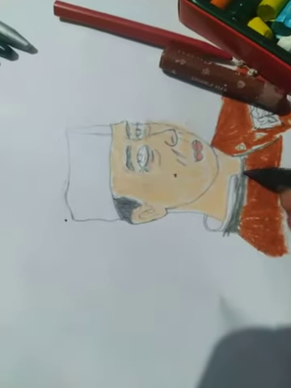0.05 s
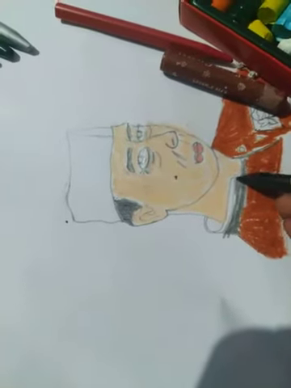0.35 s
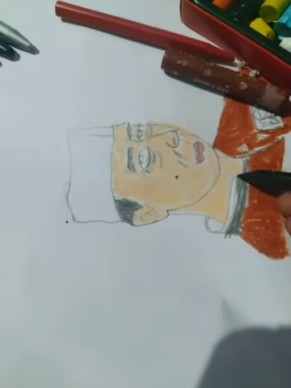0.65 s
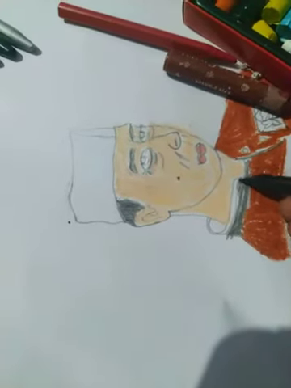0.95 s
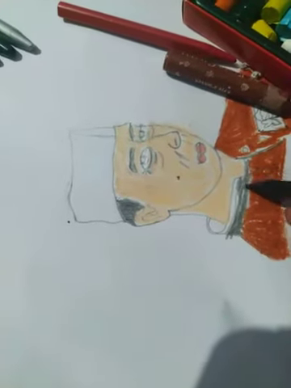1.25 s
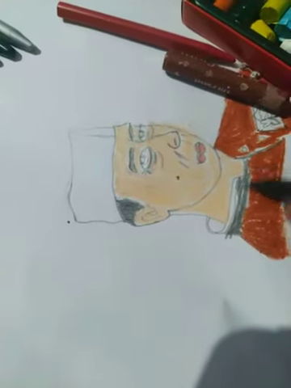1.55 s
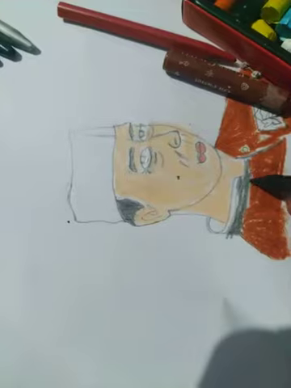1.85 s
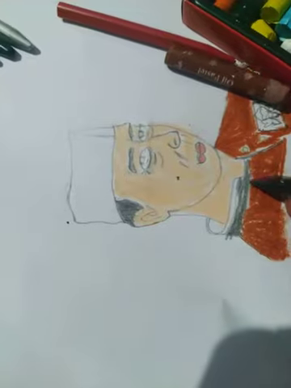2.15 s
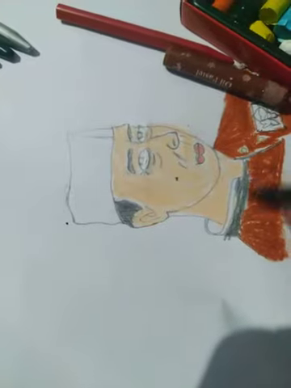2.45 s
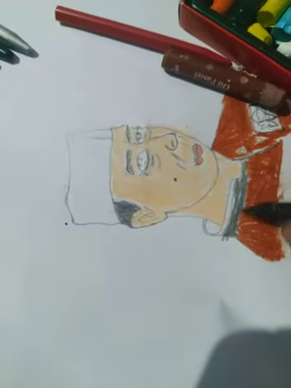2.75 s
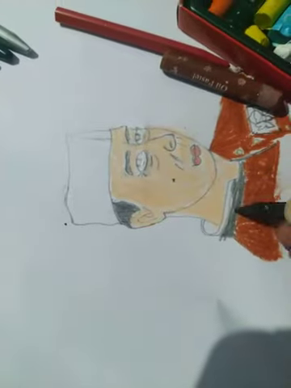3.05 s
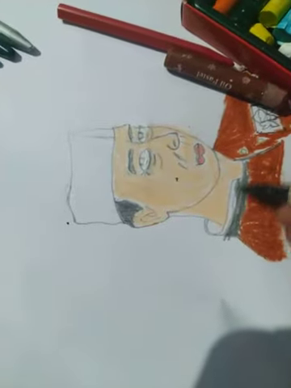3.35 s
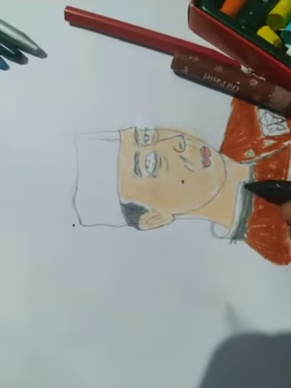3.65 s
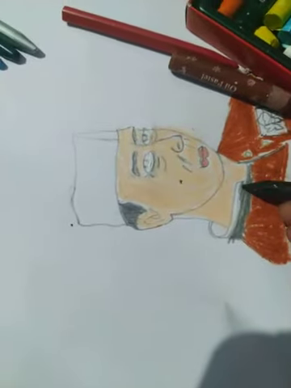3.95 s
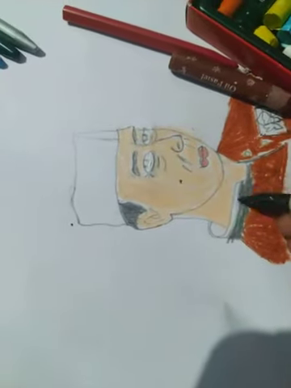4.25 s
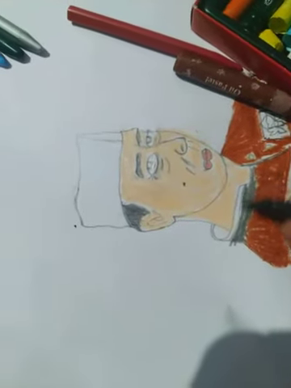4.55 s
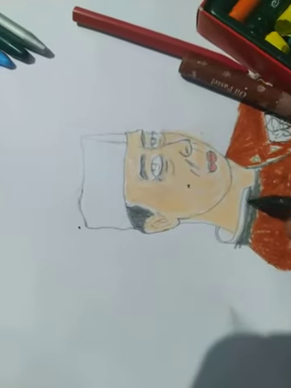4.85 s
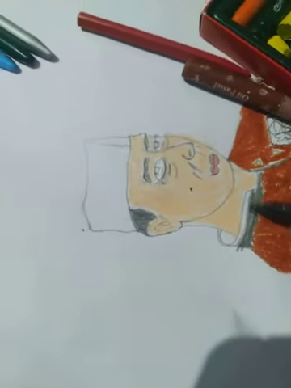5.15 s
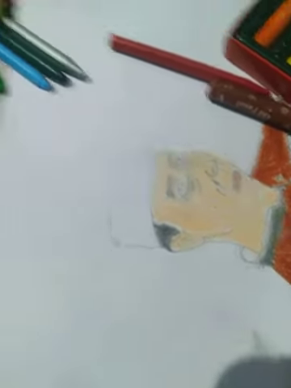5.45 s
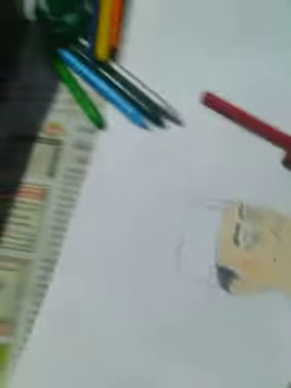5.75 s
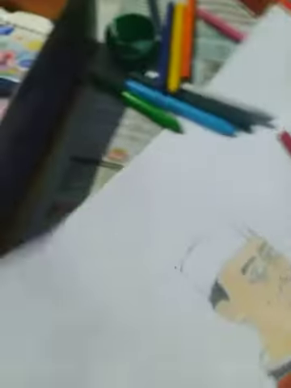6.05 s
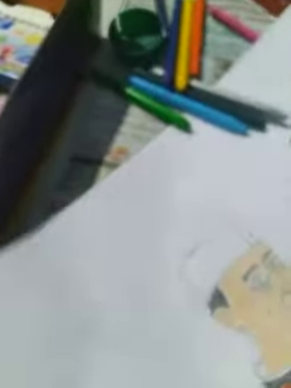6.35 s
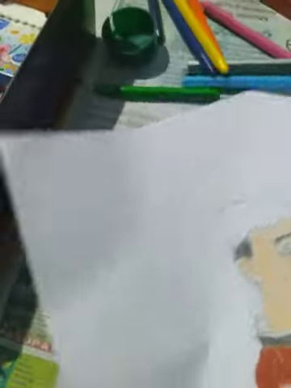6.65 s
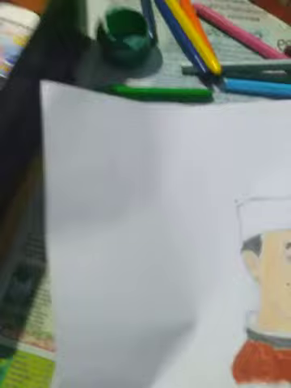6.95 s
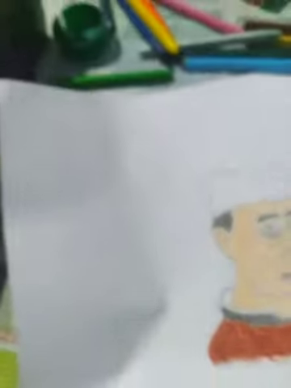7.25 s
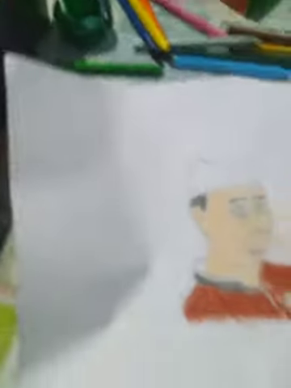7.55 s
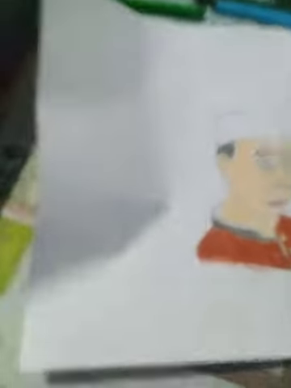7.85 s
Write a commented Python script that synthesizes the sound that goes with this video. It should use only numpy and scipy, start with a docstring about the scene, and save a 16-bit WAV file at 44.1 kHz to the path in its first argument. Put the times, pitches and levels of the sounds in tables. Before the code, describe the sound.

Soft, quick crayon strokes on a desk give way to louder rustling and popping as the paper is dragged and lifted.

```python
"""At a desk in a small room with a low hum, a wax crayon shades a drawing in quick back-and-forth strokes.
The wax sticks and slips on the paper, and the tip bumps the desk through it. Then the sheet is dragged
over newspaper and lifted: it hisses as it slides and buckles with dull pops and crisp snaps.
Now and then a crayon knocks on the desk with a short woody ring."""
import sys
import numpy as np
from scipy import signal
from scipy.fft import rfft, irfft, next_fast_len
from scipy.io import wavfile
from scipy.ndimage import map_coordinates

SR = 44100
rng = np.random.default_rng(int(sys.argv[2]) if len(sys.argv) > 2 else 0)


def to_wav(s):
    """Save 16-bit WAV."""
    ch = np.atleast_2d(s).T  # columns
    pcm = np.round(np.clip(ch, -1, 1) * 32767)  # PCM
    wavfile.write(sys.argv[1], SR, pcm.astype(np.int16))


N = 353241


def amp(db):
    """Turn decibels into a number to multiply a sound by."""
    return 10 ** (np.asarray(db) / 20)


def unit(pair):
    """Scale left and right so that their average has a strength (rms) of 1."""
    return pair / np.sqrt(np.mean(pair.mean(0) ** 2) + 1e-20)


def along(points, hz):
    """Read between the rows of a (frequency, value) table, with octaves evenly spaced."""
    freqs, values = np.transpose(points)
    return np.interp(np.log(hz + 1), np.log(freqs + 1), values)


def wobble(rate):
    """A smooth curve through `rate` random values a second."""
    return map_coordinates(rng.standard_normal(int(N * rate / SR) + 4), [np.arange(N) * rate / SR])


def filtered(x, response):
    """Turn each frequency of x up or down by response(hz)."""
    size = next_fast_len(N + SR // 2)
    return irfft(rfft(x, size) * response(np.fft.rfftfreq(size, 1 / SR)), size)[..., :N]


def ringing(noise, centre_hz, width_hz):
    """Keep the noise near one frequency, so that it rings with a wavering pitch."""
    return unit(filtered(noise, lambda hz: 1 / (1 + ((hz - centre_hz) / width_hz) ** 2)))


def add(track, start, sound):
    """Mix a sound into the track, `start` seconds in."""
    part = track[..., round(start * SR):][..., :sound.shape[-1]]
    part += sound[..., :part.shape[-1]]


# how alike left and right sound: f/Hz, likeness (1 = the same, 0 = unrelated)
LIKENESS = [(60, 0.96), (130, 0.81), (300, 1), (640, 0.085), (1400, -0.19), (3000, 0.011), (15000, -0.05)]

def stereo_shares(hz):
    """How much sound the two sides have in common, and how much they have with opposite signs."""
    angle = np.arccos(np.clip(along(LIKENESS, hz), -1, 1)) / 2
    return np.array([np.cos(angle), np.sin(angle)])


def spread(noises, tone, balance):
    """Give two unrelated noises a tone and place them between left and right."""
    common, opposite = filtered(noises, lambda hz: amp(along(tone, hz)) * stereo_shares(hz))
    pair = np.array([common + opposite, common - opposite])
    return unit(filtered(pair, lambda hz: amp(np.outer([.5, -.5], along(balance, hz)))))


def friction(tone, balance, slips_per_s, slip_db):
    """Rubbing is smooth noise plus tiny clicks as paper fibres catch and slip."""
    slips = (rng.random(N) < slips_per_s / SR) * rng.standard_normal((2, N))
    smooth = unit(rng.standard_normal((2, N)))
    return spread(smooth + amp(slip_db) * unit(slips), tone, balance)


# the tone of the room's steady noise: f/Hz, level/dB
AIR_TONE = [(25, -34), (48, -16), (90, -5), (120, -10), (190, -7.5), (300, -9.5), (430, -6), (520, -16),
            (930, -19), (1150, -20), (1700, -25.5), (5000, -33.5), (7900, -42.5), (12000, -33.5),
            (16000, -40)]

def background(air_db=-60, hum_db=-65):
    """Low room noise with a wavering hum."""
    air = spread(rng.standard_normal((2, N)), AIR_TONE, balance=[(100, 0), (10000, 0)])
    return amp(air_db) * air + amp(hum_db) * ringing(air, centre_hz=57, width_hz=5)


# how long the echo lasts (a fade time is the time to drop by 60 dB): f/Hz, fade/s
ECHO_FADE = [(100, 0.5), (300, .38), (1000, 0.25), (10000, 0.7)]
# the tone of the echo: f/Hz, level/dB
ECHO_TONE = [(50, 14), (140, -0.5), (250, 5.5), (420, -13), (620, 4), (2000, -4), (10000, -4.5)]

def room_echo(sound):
    """The walls answer each sound with a short wash of reflections, strongest in the bass."""
    hz, t, noise = signal.stft(rng.standard_normal((2, SR // 2)), SR, nperseg=256)
    common, opposite = stereo_shares(hz)[:, :, None] * noise
    fade = amp(-60 * t / along(ECHO_FADE, hz)[:, None])
    tail = signal.istft(fade * np.array([common + opposite, common - opposite]), SR, nperseg=256)[1]
    delayed = np.pad(sound, ((0, 0), (SR // 250, 0)))  # 4 ms late
    echo = signal.fftconvolve(delayed, tail / np.linalg.norm(tail[0]), axes=1)[:, :N]
    return filtered(echo, lambda hz: amp(along(ECHO_TONE, hz)))


# hard knocks of a crayon: t/s, level/dB, brightness/dB per octave
CRAYON_KNOCKS = [(2.067, -45.5, 18), (3.5005, -45, 11), (5.595, -28, 6), (5.598, -26.5, 9),
                 (5.6045, -28.5, 12), (6.4724, -7.5, 3), (7.9235, -33, 18), (7.9388, -29, 14)]
# the notes that ring in each knock: f/Hz, level/dB, fade/s
KNOCK_NOTES = [(1370, -16, 0.011), (1640, -10.5, 0.031), (1958, -17, 0.052), (2020, 3.5, 0.0058),
               (2340, 4, 0.0071), (2640, -19, 0.059), (3160, -16, 0.028), (3690, -17, 0.014),
               (3940, -28, 0.014), (4540, -30, 0.027)]

def knocks(level_db=-6):
    """A crayon strikes the desk and sets off short woody notes, a little louder on the left."""
    track, t = np.zeros(N), np.arange(SR // 8) / SR
    onset = 1 - np.exp(-t / .0003)
    for start, db, brightness in CRAYON_KNOCKS:
        for hz, note_db, fade_s in KNOCK_NOTES:
            start_db = db + level_db + note_db + brightness * np.log2(hz / 2200)
            add(track, start, onset * amp(start_db - 60 * t / fade_s) * np.sin(2 * np.pi * hz * t))
    return track * amp([[1], [-1]])


def hand_speed(start, length, rise_s, stop_s, sag_db_per_s=0):
    """The hand speeds up smoothly, moves on until `length` seconds are over, then comes to rest."""
    t = np.arange(N) / SR - start
    ease = lambda u: np.sin(np.pi / 2 * np.clip(u, 0, 1)) ** 2
    sag = amp(-sag_db_per_s * np.clip(t, 0, length))
    return ease(t / rise_s) * sag * ease(1 - (t - length) / stop_s)


# the sheet is dragged over newspaper: t/s, length/s, level/dB, extra edge hiss/dB
SHEET_DRAGS = [(5.564, 0.048, -46, 1), (5.661, 0.35, -44, 6.8), (6.302, 0.14, -47, 3),
               (6.431, .23, -45.5, 4.5), (6.636, 0.18, -49.5, 3.5)]

def drag_gains(bend_db=-14, rasp_db=-10):
    """How strongly dragging drives paper(): mostly sliding, and hiss that grows faster than the speed."""
    slide, hiss = np.zeros((2, N))
    for start, length, db, edge_db in SHEET_DRAGS:
        speed = hand_speed(start, length, rise_s=.12, stop_s=.13, sag_db_per_s=4.5)
        slide = np.hypot(slide, amp(db) * speed)  # overlapping noises add by their squares
        hiss = np.hypot(hiss, amp(db + edge_db) * speed ** 1.2)
    return np.array([amp(bend_db) * slide, amp(rasp_db) * slide, slide, hiss])


# the hand flexes the sheet: t/s, length/s, level/dB, crispness/dB
SHEET_RUSTLES = [(5.23, 0.12, -72.5, -1), (5.33, 0.084, -58, -5.5), (5.445, 0.039, -57, 4.5),
                 (5.5, 0.092, -58, 0.5), (5.58, 0.019, -51.5, 7), (5.995, 0.026, -55.5, -4.5),
                 (6.07, .07, -69, 0), (6.16, 0.096, -59, 0), (6.275, 0.11, -64, 3), (6.74, .1, -58, 1.5),
                 (6.85, .06, -65.5, 4), (6.93, .55, -66.3, 4.3), (7.1, 0.037, -60, -1.5),
                 (7.47, .25, -61.5, -1.5), (7.62, .1, -56.5, 1.5), (7.76, .22, -65, -6.5),
                 (7.925, 0.021, -60.5, 1)]

def rustle_gains(bend_db=4, rasp_db=-1, slide_db=-4, hiss_db=3):
    """How strongly flexing drives paper(): a crisper rustle has less bending and more hiss."""
    power = np.zeros((4, N))
    for start, length, db, crisp_db in SHEET_RUSTLES:
        ease_s = .2 * length  # long rustles start and stop more gently
        speed = hand_speed(start, length, rise_s=.016 + ease_s, stop_s=.04 + ease_s)
        mix = amp([bend_db - crisp_db, rasp_db, slide_db, hiss_db + crisp_db])
        power += np.outer(mix, amp(db) * speed) ** 2
    return np.sqrt(power)


# the tones of the sheet's four noises, from low to high: f/Hz, level/dB
BEND_TONE = [(30, -17), (65, 2.5), (110, -1), (200, -6.5), (350, -5), (600, -15.5), (1200, -17.5),
             (2500, -54)]
RASP_TONE = [(250, -43), (550, -1.5), (1000, -2.5), (1500, 5.5), (2500, 5), (3300, -1), (4200, -8),
             (6000, -37)]
SLIDE_TONE = [(1800, -13.5), (3000, -6), (4000, -2), (5000, -3.5), (6500, -7), (7900, -18.5), (10000, -27)]
EDGE_TONE = [(6500, -50), (8000, -19.5), (9300, -7.5), (10700, -3), (12200, 0.5), (14000, -5), (16000, -11)]
# which side the sheet is heard on: f/Hz, left minus right/dB
SHEET_BALANCE = [(200, 4.5), (1300, 2), (2400, 2), (4400, -1), (8000, 1), (11000, 8.5), (15000, 8)]

def paper(bend_gain, rasp_gain, slide_gain, hiss_gain, flutter_db=1.02):
    """The sheet rumbles as it bends, its face rasps and slides, and its edge hisses."""
    bend = bend_gain * friction(BEND_TONE, SHEET_BALANCE, slips_per_s=120, slip_db=-3)
    rasp = rasp_gain * friction(RASP_TONE, SHEET_BALANCE, slips_per_s=250, slip_db=-12)
    slide = slide_gain * friction(SLIDE_TONE, SHEET_BALANCE, slips_per_s=570, slip_db=-17)
    # so many fibres touch at once that the hiss is almost smooth
    hiss = hiss_gain * friction(EDGE_TONE, SHEET_BALANCE, slips_per_s=3000, slip_db=-8)
    return bend + amp(flutter_db * wobble(90)) * (rasp + slide + hiss)


# the sheet buckles with a pop and a snap: t/s, pop level/dB, pop f/Hz, snap level/dB
SHEET_BUCKLES = [(5.339, -36.5, 272, -33.5), (5.351, -48, 298, -33), (5.382, -34, 227, -50),
                 (5.456, -37, 258, -30.5), (5.596, -33.5, 300, -32), (5.775, -38, 219, -48),
                 (6.008, -40, 430, -44), (6.022, -37, 453, -32), (6.158, -55, 302, -40),
                 (6.175, -39, 236, -30), (6.267, -16, 205, -19), (6.322, -44, 251, -38),
                 (6.4736, -16.5, 279, -19), (6.584, -30, 405, -42), (6.601, -35.5, 220, -38),
                 (6.691, -39, 630, -45), (6.864, -38, 464, -41), (7.583, -24, 232, -48),
                 (7.686, -39, 600, -48), (7.758, -43, 266, -48), (7.808, -45, 247, -41),
                 (7.851, -42, 300, -47), (7.893, -41, 380, -35), (7.941, -36, 380, -36)]

def snaps(level_db=-5, crack_fade_s=.0098, shiver_db=-19, shiver_fade_s=.071):
    """Just before each pop, a crease gives way with a bright crack and a brief shiver of the sheet."""
    track, t = np.zeros((2, N)), np.arange(SR // 10) / SR
    fade = amp(-60 * t / crack_fade_s) + amp(shiver_db - 60 * t / shiver_fade_s)
    for pop_time, _, pop_hz, db in SHEET_BUCKLES:
        crack = amp(db + level_db) * fade * rng.standard_normal((2, len(t)))
        add(track, pop_time - .5 / pop_hz, crack)
    # f/Hz, level/dB
    tone = [(200, 5), (1000, 9), (3000, 1), (6000, -5), (8000, -15.5), (11000, 2), (16000, -7)]
    return filtered(track, lambda hz: amp(along(tone, hz) + np.outer([.5, -.5], along(SHEET_BALANCE, hz))))


# the crayon's tip lands on the paper: t/s, level/dB, f/Hz
TIP_TAPS = [(.691, -44.5, 430), (.945, -46.5, 490), (1.042, -44, 384), (1.165, -34, 484), (1.282, -49, 600),
            (1.967, -47, 260), (2.069, -44, 280), (2.72, -45, 89.5), (3.502, -43.5, 754),
            (4.353, -43.5, 457), (5.134, -48, 597), (5.255, -42, 460)]
# the desk's low notes under taps and pops: f/Hz, level/dB, fade/s
DESK_NOTES = [(84, -24, .08), (140, -22.5, .1), (205, -27, .1)]

def thumps(rebound=.48):
    """Tapped or buckling paper pulls, pushes and pulls the air again, and the desk rings low."""
    track, t = np.zeros(N), np.arange(-SR // 50, SR // 5) / SR
    after = np.maximum(t, 0)
    desk = -sum(amp(db - 60 * after / fade_s) * np.sin(2 * np.pi * hz * after)
                for hz, db, fade_s in DESK_NOTES)
    for time, db, hz, *_ in TIP_TAPS + SHEET_BUCKLES:
        stretch = 1 + rebound * np.tanh(hz * t)  # the second pull is slower
        bulge = np.exp(-(np.pi * hz * t / stretch) ** 2)
        push = -np.gradient(np.gradient(bulge))  # air pressure follows the paper's acceleration
        add(track, time + t[0], amp(db) * (push / push.max() + desk))
    return track * amp([[.5], [-.5]])


# the sizzle changes as the grip shifts: t/s, level/dB, lower ring/dB, upper ring/dB
GRIP_SHIFTS = [(1.9, -2.5, -14, -12), (2.3, -4.5, 0, -16), (3.6, -3, -7, -22), (4.3, -1.5, -2, -4)]
# the tone of the tip's hiss: f/Hz, level/dB
SIZZLE_TONE = [(6000, -55), (8000, -15), (9500, -2), (11000, 3), (13500, 1), (14500, 2), (16000, -3)]
# the tip's lower and upper ring: f/Hz, width/Hz
TIP_RINGS = [(10950, 1100), (12650, 620)]
# which side the crayon is heard on: f/Hz, left minus right/dB
TIP_BALANCE = [(100, -8), (500, 4), (1300, -6), (2400, 7), (4400, -4), (9000, 3), (15000, 2.5)]

def tip_sizzle(t):
    """Tiny slips make a high hiss and ring the tip; the grip sets how they share the sound."""
    times, *columns = np.transpose(GRIP_SHIFTS)
    level, *shares = [amp(np.interp(t, times, column)) for column in columns]
    sizzle = friction(SIZZLE_TONE, TIP_BALANCE, slips_per_s=3100, slip_db=0)
    for share, (hz, width_hz) in zip(shares, TIP_RINGS):
        rub = friction(SIZZLE_TONE, TIP_BALANCE, slips_per_s=2000, slip_db=1)
        sizzle += share * ringing(rub, hz, width_hz)
    return level * sizzle / np.sqrt(1 + np.sum(np.square(shares), 0))


# the middle of each crayon stroke: t/s, level/dB
CRAYON_STROKES = [(.071, -65.5), (.181, -69.5), (.466, -75.5), (.548, -73.5), (.716, -69), (.85, -72),
                  (.969, -71.5), (1.07, -66.5), (1.188, -68.5), (1.306, -69), (1.41, -66.5), (1.55, -65),
                  (1.672, -68.5), (1.796, -69.5), (2.176, -63.5), (2.309, -68), (2.458, -60.5),
                  (2.583, -64.5), (2.722, -64), (2.844, -62), (2.996, -61.5), (3.104, -61), (3.224, -62),
                  (3.333, -66.5), (3.449, -62.5), (3.558, -62.5), (3.73, -68), (3.829, -69.5),
                  (4.17, -69.5), (4.315, -68.5), (4.424, -65.5), (4.548, -66.5), (4.677, -62.5),
                  (4.797, -66), (4.928, -66.5), (5.039, -67.5), (5.18, -65.5)]
# the tones of wax scratching paper and of the hollow desk beneath: f/Hz, level/dB
SCRATCH_TONE = [(500, -15), (1100, -0.5), (1600, -3), (2000, 0.5), (2550, -2.5), (2900, -7), (3500, -4.5),
                (4200, -12.5), (6000, -13), (7800, -25), (10000, -45)]
DESK_TONE = [(30, -21), (65, -2), (120, -4.5), (220, 2.5), (430, 2), (620, -5), (880, -2), (1250, -16),
             (1800, -32), (3000, -52)]

def crayon(scratch_db=1, sizzle_db=.5, desk_db=5, chatter_db=1.75, drift=.035):
    """Each stroke speeds up and stops; the wax sticks and slips and shakes the desk."""
    t = np.arange(N) / SR
    strokes = np.zeros(N)
    for middle, db in CRAYON_STROKES:
        length = .051 + .0002 * (db + 67)  # seconds; stronger strokes last slightly longer
        near = abs(t - middle) < 2 * length
        strokes[near] += amp(db) * np.exp(-abs(2 * (t[near] - middle) / length) ** 2.43 / 2)
    # the paper's tone shifts a little as the tip moves from spot to spot
    place = np.cumsum(1 + drift * wobble(8)) / SR
    roaming = lambda pair: np.array([np.interp(place % t[-1], t, side) for side in pair])
    wax_rub = roaming(friction(SCRATCH_TONE, TIP_BALANCE, slips_per_s=900, slip_db=-5.5))
    desk_rub = roaming(friction(DESK_TONE, TIP_BALANCE, slips_per_s=180, slip_db=-3.5))
    tip = strokes * (amp(scratch_db) * wax_rub + amp(sizzle_db) * tip_sizzle(t))
    # the desk's sound grows with the stroke, but more slowly than the scratch
    force = strokes.max() * (strokes / strokes.max()) ** .76
    return amp(chatter_db * wobble(220)) * (tip + amp(desk_db) * force * desk_rub)


def scene():
    """Thumps, snaps, knocks and strokes with their echo, plus the moving sheet and the room's noise."""
    at_desk = thumps() + snaps() + knocks() + crayon()
    sheet = paper(*np.hypot(drag_gains(), rustle_gains()))
    return at_desk + amp(-8) * room_echo(at_desk) + sheet + background()


def record(dry, top_hz=15900):
    """Cut away the very highest treble."""
    return filtered(dry, lambda hz: hz < top_hz)


dry = scene()
out = record(dry)
to_wav(out)
```